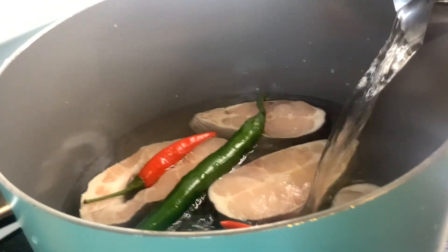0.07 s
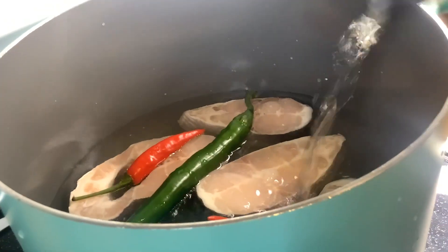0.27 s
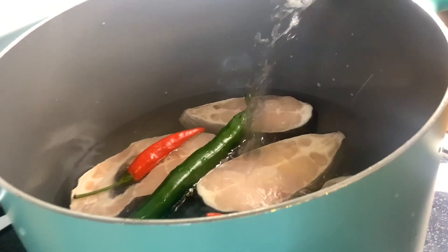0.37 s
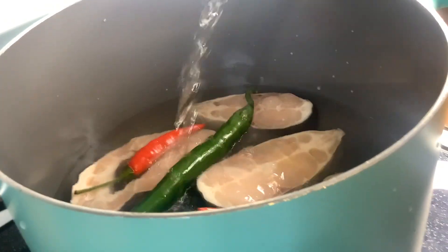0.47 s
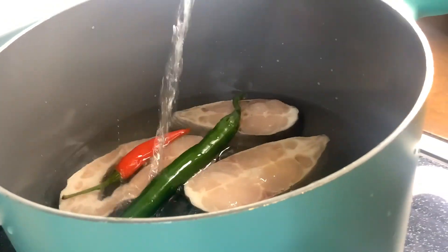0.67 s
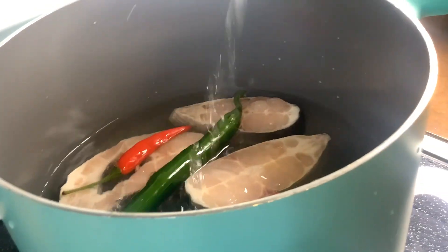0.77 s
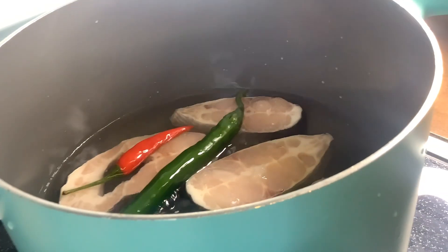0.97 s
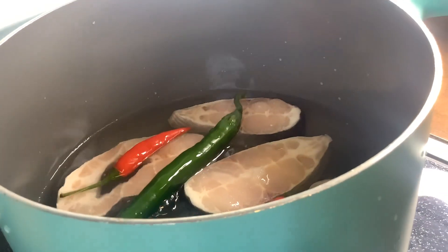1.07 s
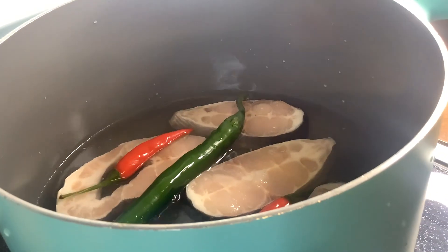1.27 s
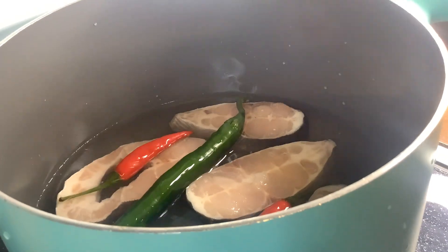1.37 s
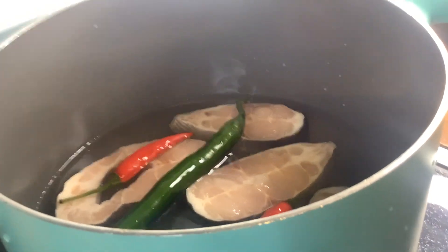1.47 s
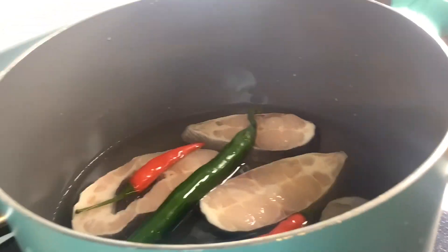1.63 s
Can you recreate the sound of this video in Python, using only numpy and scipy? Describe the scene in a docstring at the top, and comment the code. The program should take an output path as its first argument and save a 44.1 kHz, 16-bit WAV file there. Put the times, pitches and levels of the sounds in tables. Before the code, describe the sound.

Water pours into a saucepan of fish and peppers from the start, a thin stream pattering with low glugs around 0.2 to 0.5 seconds. Bright, bubbly drips and small splashes are strongest from 0.55 to 0.9 seconds, then the pour tapers to faint drops, ending by about 1.3 seconds. A low appliance hum continues in the quiet kitchen, and a soft hiss swells from about 1.5 seconds.

```python
"""In a quiet kitchen, water is poured into a saucepan of fish and peppers.
A thin stream patters on the food, lumps of water slop down and big air pockets glug.
Drops tick as they land and trap small bubbles that ring. The pan echoes the stream, drops and slops,
and the room echoes all the water. An appliance hums over a low rumble; a soft hiss swells at the end."""
import sys
import numpy as np
from scipy import signal
from scipy.fft import rfft, irfft
from scipy.io import wavfile
from scipy.ndimage import uniform_filter1d

SR = 44100
rng = np.random.default_rng(int(sys.argv[2]) if len(sys.argv) > 2 else 0)


def log_audio(samples):
    """Write samples as a 16-bit WAV file to the path given in sys.argv[1]."""
    # one column per channel
    frames = np.atleast_2d(samples).T
    # limit to full scale, then quantise
    limited = np.clip(frames, -1, 1)
    pcm = np.round(limited * 32767).astype(np.int16)
    wavfile.write(sys.argv[1], SR, pcm)


N = 74970
T = np.arange(N) / SR

# How loud the stream is over time: time_s, level_db
STREAM_LEVEL = [(0, -52), (.12, -59), (.22, -58.5), (.3, -55), (.43, -60), (.54, -62.5), (.65, -57.5),
                (.7, -53.5), (.77, -70), (.83, -57.5), (.9, -64), (1, -74), (1.3, -130)]
# The stream's tone, from low to high: pitch_hz, level_db
STREAM_TONE = [(300, -2.5), (480, -1), (800, -0.5), (1100, -4.5), (2500, 0.5), (4500, 4), (8000, 1),
               (15000, 0)]
# Echoes off the pan walls: delay_s, gain
WALL_ECHOES = [(.0019, 0.26), (.0037, 0.25)]
# Notes at which the pan and the air in it ring: pitch_hz, level_db
PAN_NOTES = [(310, -50.5), (500, -55.5), (1090, -50), (1453, -58), (1593, -57), (2030, -51.5), (2740, -51),
             (3420, -54), (3880, -60), (4585, -55.5), (4860, -64.5), (5180, -62.5), (5600, -56)]
# The tone of the room's echo: pitch_hz, level_db
ROOM_TONE = [(150, -14), (400, 0.5), (1500, -11), (9000, -1)]
# The tone of the room's rumble: pitch_hz, level_db
RUMBLE_TONE = [(30, -41.5), (50, -22), (72, 5), (170, -1), (240, -6), (330, -2.5), (450, -11), (700, -30),
               (2500, -39), (15000, -38.5)]
# Drops landing: start_s, bubble_pitch_hz, bubble_db, tick_db
DROP_HITS = [(.017, 5470, -50, -82), (.066, 3500, -51.5, -65), (0.112, 4680, -49, -50),
             (0.181, 3130, -51.5, -54.5), (0.276, 12600, -46, -46), (0.3259, 1820, -48, -36.5),
             (0.323, 3330, -43, -45), (0.353, 3880, -54, -48), (0.387, 15800, -40.5, -48),
             (0.4229, 2210, -50, -72), (0.4467, 7700, -46.5, -55), (0.4946, 4960, -41.5, -49),
             (0.492, 1676, -52, -43), (0.549, 8650, -38, -40.5), (0.567, 6940, -27.5, -49),
             (.567, 9460, -22, -37), (0.568, 4664, -33, -64), (0.591, 14600, -32, -35),
             (0.599, 2730, -51, -60), (.617, 2300, -41, -39), (0.6211, 2757, -39.5, -46),
             (.632, 5240, -20, -31), (0.6361, 4830, -24.5, -38), (.680, 5020, -55, -32.5),
             (0.706, 3540, -39.5, -42.5), (0.722, 3916, -32, -41), (0.725, 4400, -30.5, -58),
             (.739, 9640, -31.5, -38.5), (.746, 7460, -44, -51), (0.755, 4760, -47, -48),
             (0.767, 2980, -49.5, -37), (0.7909, 11380, -27.5, -49), (.793, 4550, -34, -71),
             (0.804, 4946, -40.5, -38), (0.812, 2910, -40, -67), (0.832, 1856, -40, -34),
             (0.8386, 12340, -31, -30.5), (.863, 10300, -51, -47), (0.908, 9380, -39.5, -49),
             (0.945, 3460, -58.5, -75), (0.966, 6250, -60.5, -59), (1.005, 3940, -65.5, -84.5),
             (1.029, 6340, -62, -65), (1.0481, 3990, -64, -80), (1.0794, 3984, -60.5, -70),
             (1.1185, 2677, -60, -83)]
# The basic tone that all ticks share: pitch_hz, level_db
TICK_TONE = [(500, -14), (1500, -1), (8000, 2), (15000, 6.5)]
# Lumps of water landing: start_s, level_db, pitch_hz, fade_s (a fade is the time to fall by 60 dB)
SLOP_HITS = [(0.042, -50, 10570, 0.052), (0.106, -53, 5100, 0.057), (0.116, -49, 960, 0.023),
             (0.222, -52, 900, 0.046), (0.254, -50, 5730, 0.039), (.263, -47.5, 583, 0.23),
             (.273, -48, 980, 0.31), (.458, -48, 7400, 0.055), (.671, -39.5, 5800, .04),
             (.672, -52.5, 610, 0.083), (0.701, -49, 520, 0.11), (.804, -36.5, 613, 0.086),
             (.848, -56, 1390, 0.41), (.848, -41, 352, 0.17)]
# Big air pockets, and last a low knock: peak_s, pitch_hz, glide_per_s (as a share of the pitch), level_db,
# swell_s, fade_s
GLUG_NOTES = [(0.181, 350, 5, -47.5, .005, 0.04), (.207, 281, -1, -41, 0.01, 0.24),
              (.236, 329, 4, -31, .01, 0.033), (.268, 349, 6, -39.5, 0.025, 0.042),
              (0.283, 1305, 5.5, -44.5, 0.0067, 0.085), (0.328, 214, 0.5, -37.5, 0.0018, 0.025),
              (.497, 552, -0.3, -39, 0.0018, 0.044), (0.498, 290, -2.1, -41, .003, .04),
              (.526, 356, -3, -48.5, 0.0059, 0.26), (.588, 566, -1, -51, 0.0068, 0.064),
              (.677, 947, -3, -42, .003, 0.016), (.808, 761, -1, -41, 0.0022, 0.093),
              (.812, 482, -13, -43.5, 0.0024, 0.049), (0.868, 359, -2, -33.5, 0.01, 0.063),
              (1.228, 325, 6, -42.5, .002, 0.02)]
# How loud the hiss is over time: time_s, level_db
HISS_SWELL = [(1.48, -105), (1.565, -63.5), (1.595, -56), (1.625, -61), (1.7, -51.5)]
# The tone of the hiss: pitch_hz, level_db
HISS_TONE = [(290, 6.5), (600, 9), (1700, -1), (4200, 1), (6500, -8), (15000, -16.5)]


def from_db(db):
    """Turn decibels into a gain, a number to multiply a sound by."""
    return 10 ** (np.asarray(db) / 20)


def rms_one(x):
    """Scale a sound so that its average strength (rms) is 1."""
    return x / np.sqrt(np.mean(x ** 2) + 1e-20)


def level(rows):
    """Gain over time, from rows of time_s, level_db."""
    return from_db(np.interp(T, *np.transpose(rows)))


def tone_gain(tone, hz):
    """Gain at a pitch, from rows of pitch_hz, level_db."""
    pitches, db = np.transpose(tone)
    return from_db(np.interp(np.log(np.maximum(hz, 1)), np.log(pitches), db))


def noise(tone):
    """Steady noise with the given tone."""
    hz = np.arange(N // 2 + 1) * SR / N
    return rms_one(irfft(rfft(rng.standard_normal(N)) * tone_gain(tone, hz), N))


def fade(t, fade_s):
    """Start at 1 and fall by 60 dB every fade_s seconds."""
    return np.exp(-np.log(1000) * t / fade_s)


def rise(t, rise_s):
    """Climb smoothly from 0 towards 1."""
    return 1 - np.exp(-t / rise_s)


def wander(smooth_s=0.015):
    """A smooth random wobble around zero."""
    size = int(smooth_s * SR)
    smoothed = uniform_filter1d(rng.standard_normal(N), size, mode="wrap")
    return rms_one(uniform_filter1d(smoothed, size, mode="wrap"))


def add(out, start_s, sound):
    """Mix a sound in at its start time."""
    i = int(start_s * SR)
    out[i:i + len(sound)] += sound[:N - i]


def ring(x, hz, fade_s):
    """Make every click in x ring as one fading note."""
    keep, angle = fade(1 / SR, fade_s), 2 * np.pi * hz / SR
    return signal.lfilter([np.sin(angle)], [1, -2 * keep * np.cos(angle), keep * keep], x + 1e-18)


def stream(bubbles_per_s=6000, size_spread_db=3.6, patchy_db=2, surge_db=4, ring_cycles=30):
    """The uneven stream patters as many tiny, short bubbles; the small, high ones come most often."""
    pitches = np.geomspace(280, 15000, 36)
    shares = np.sqrt(pitches) / np.sqrt(pitches).sum()
    out = np.zeros(N)
    for hz, share in zip(pitches, shares):
        size_db = size_spread_db * np.minimum(rng.exponential(1, N), 3.5) + patchy_db * wander()
        sizes = from_db(size_db) * rng.choice([-1, 1], N)
        clicks = sizes * (rng.random(N) < bubbles_per_s * share / SR)
        bubbles = ring(clicks, hz, fade_s=min(ring_cycles / hz, 0.04))
        out += tone_gain(STREAM_TONE, hz) * rms_one(bubbles)
    return level(STREAM_LEVEL) * rms_one(out * from_db(surge_db * wander()))


def pan(x, flutter_db=-8):
    """Sound bounces off the pan walls, blurs into a short flutter and makes the pan ring faintly."""
    echoes = noise([(100, 10), (2000, 6)]) * fade(T, 0.043) * rise(T, 0.0022)
    echoes *= from_db(flutter_db) / np.linalg.norm(echoes)
    echoes[0] += 1  # the sound itself
    for delay_s, gain in WALL_ECHOES:
        echoes[int(delay_s * SR)] += gain
    ringing = sum(from_db(db) * ring(x, hz, fade_s=0.19) for hz, db in PAN_NOTES)
    return signal.fftconvolve(x, echoes)[:N] + ringing


def room_echo(x, level_db=-14, split_hz=6000):
    """The many echoes of a small room blend into one short tail."""
    tail = np.zeros(N)
    for side, fade_s in (("low", 0.33), ("high", 0.34)):
        band = signal.butter(2, split_hz, side, fs=SR, output="sos")
        tail += signal.sosfilt(band, noise(ROOM_TONE)) * fade(T, fade_s)
    tail *= rise(T, 0.0083)
    return from_db(level_db) * signal.fftconvolve(x, tail / np.linalg.norm(tail))[:N]


def hum_and_rumble(hum_hz=119.8, hum_db=-58, rumble_db=-62):
    """An appliance hums on one steady note over the room's low rumble."""
    hum = np.sqrt(2) * np.sin(2 * np.pi * (hum_hz * T + rng.random()))
    return from_db(hum_db) * hum + from_db(rumble_db) * noise(RUMBLE_TONE)


def tick(t, bubble_hz, fall_db_per_octave=9, crack_db=6.5):
    """A drop lands with a sharp crack and a short noise, strongest near its bubble's pitch."""
    hz = np.maximum(np.arange(len(t) // 2 + 1) * SR / len(t), 1)
    octaves_away = np.abs(np.log2(hz / bubble_hz))
    tone = tone_gain(TICK_TONE, hz) * from_db(-fall_db_per_octave * octaves_away)
    burst = rms_one(irfft(rfft(rng.standard_normal(len(t))) * tone, len(t)))
    return burst * (fade(t, 0.02) + from_db(crack_db) * fade(t, 0.003)) / 2


def drops(glide_per_s=1.3, spray_count=6, spray_spread=0.13):
    """Each drop ticks and traps a bubble with a spray of fainter ones; all ring and rise in pitch."""
    out, t = np.zeros(N), T[:SR // 10]
    for start_s, hz, bubble_db, tick_db in DROP_HITS:
        fade_s = 0.023 * (4000 / hz) ** 0.89  # higher bubbles fade sooner
        shape = fade(t, fade_s) * rise(t, 0.00023)
        phase = 2 * np.pi * hz * t * (1 + glide_per_s * t / 2)
        add(out, start_s, from_db(bubble_db) * shape * np.sin(phase) + from_db(tick_db) * tick(t, hz))
        # The spray is 13 dB below its bubble, and weaker still for bubbles under -49 dB.
        spray_db = bubble_db - 13 + 0.7 * min(bubble_db + 49, 0)
        pitch_steps = np.linspace(-1.3, 1.5, spray_count) + rng.uniform(-0.22, 0.3, spray_count)
        for ratio in np.exp(spray_spread * pitch_steps):
            add(out, start_s + rng.uniform(0, 0.0022), from_db(spray_db) * shape * np.sin(ratio * phase))
    return out


def slops(slaps_per_s=7000, width_ratio=1.405):
    """A lump of water lands as a fading cluster of small slaps."""
    out, t = np.zeros(N), T[:SR // 3]
    for start_s, db, hz, fade_s in SLOP_HITS:
        slaps = rng.standard_normal(len(t)) * (rng.random(len(t)) < slaps_per_s / SR)
        band = signal.butter(2, [hz / width_ratio, hz * width_ratio], "band", fs=SR, output="sos")
        splash = rms_one(signal.sosfilt(band, slaps))
        add(out, start_s, from_db(db) * splash * fade(t, fade_s) * rise(t, 0.0007))
    return out


def glugs(wobble_share=0.039):
    """Each big air pocket swells into a low, gliding, wobbling note and dies away; the last row is a short low
    knock."""
    out = np.zeros(N)
    for peak_s, hz, glide_per_s, db, swell_s, fade_s in GLUG_NOTES:
        t = T - peak_s
        shape = np.exp(np.minimum(t, 0) / swell_s) * fade(np.maximum(t, 0), fade_s)
        pitch_hz = hz * (1 + glide_per_s * t + wobble_share * wander())
        cycles = np.cumsum(pitch_hz) / SR
        out += from_db(db) * shape * np.sin(2 * np.pi * (cycles - cycles[int(peak_s * SR)]))
    return out


def hiss():
    """A soft hiss swells at the end."""
    return level(HISS_SWELL) * noise(HISS_TONE)


def scene():
    """Mix the water, its echoes and the background into one channel."""
    water = pan(drops() + slops() + stream()) + glugs()
    return (water + room_echo(water) + hum_and_rumble() + hiss())[None]


def record(dry, cutoff_hz=16000):
    """Cut away the very highest sounds."""
    return signal.sosfilt(signal.ellip(10, 0.2, 70, cutoff_hz, fs=SR, output="sos"), dry)


dry = scene()
out = record(dry)
log_audio(out)
```